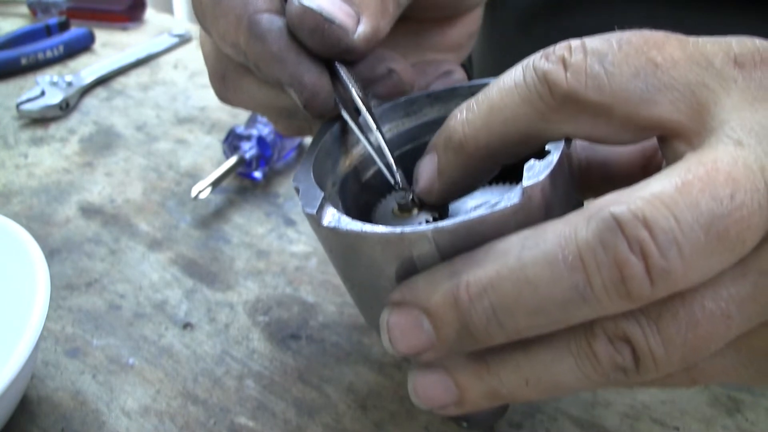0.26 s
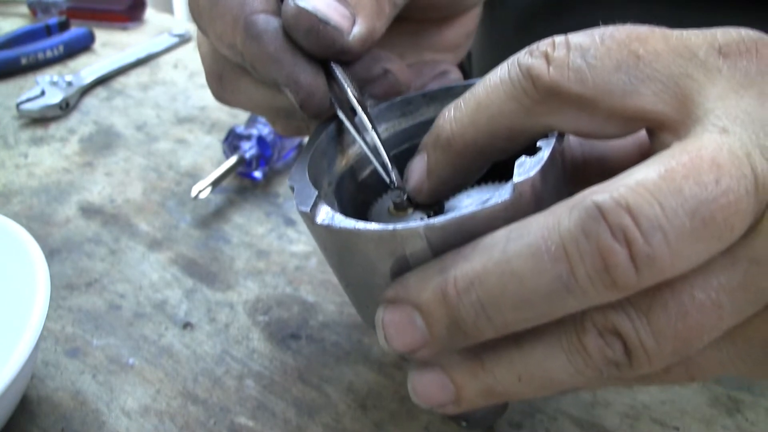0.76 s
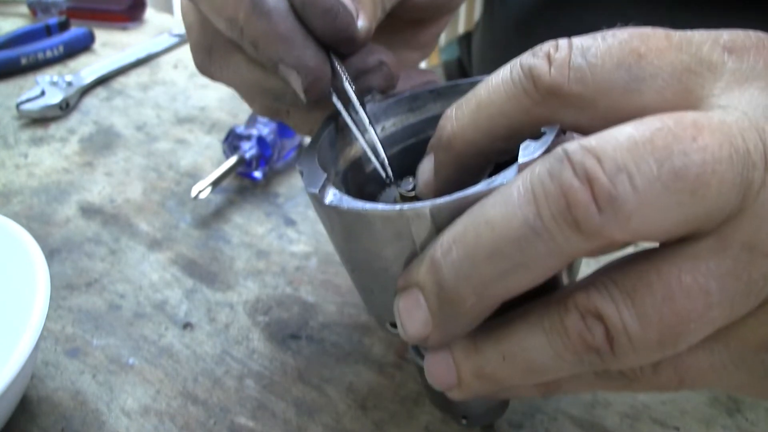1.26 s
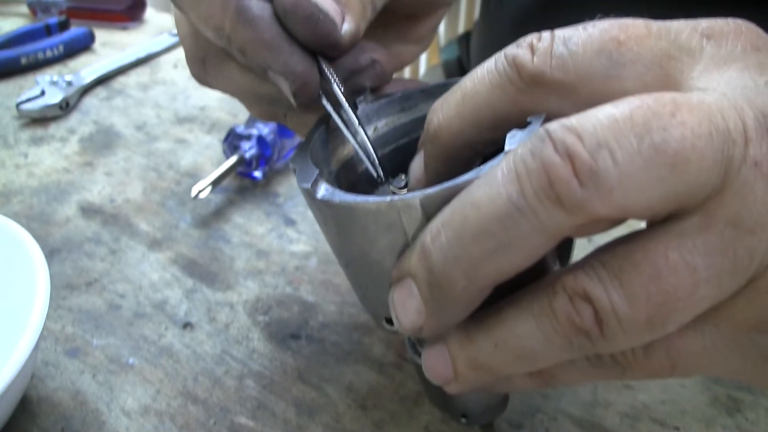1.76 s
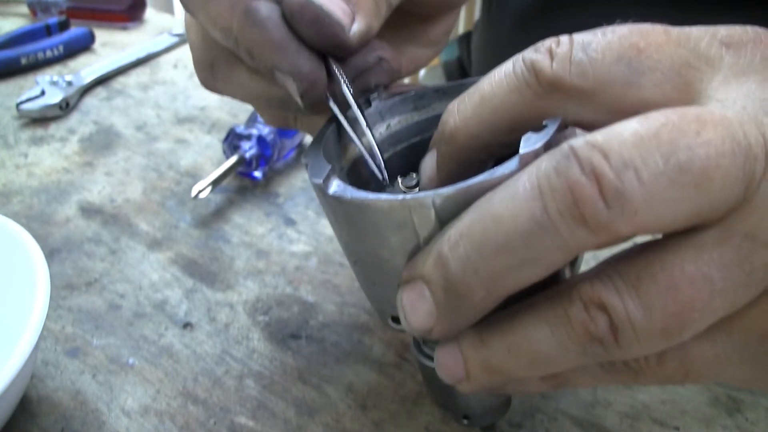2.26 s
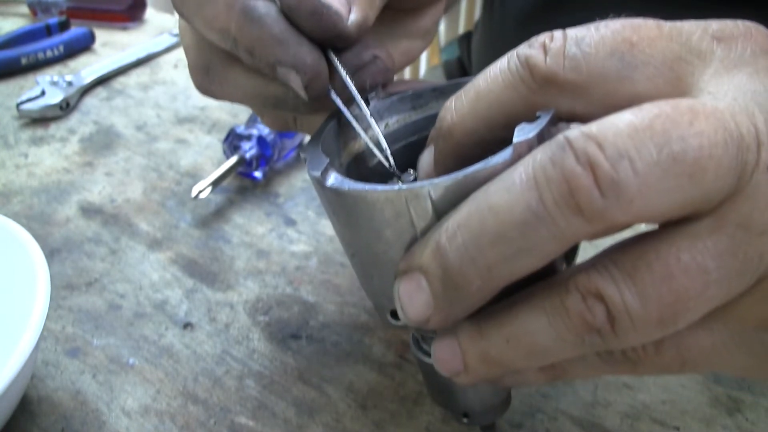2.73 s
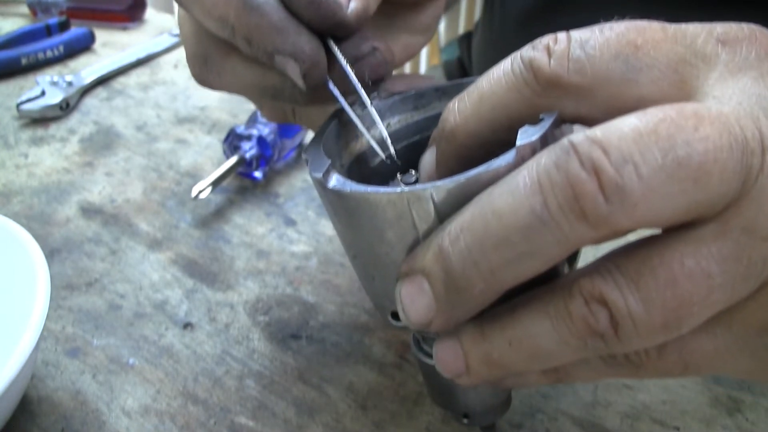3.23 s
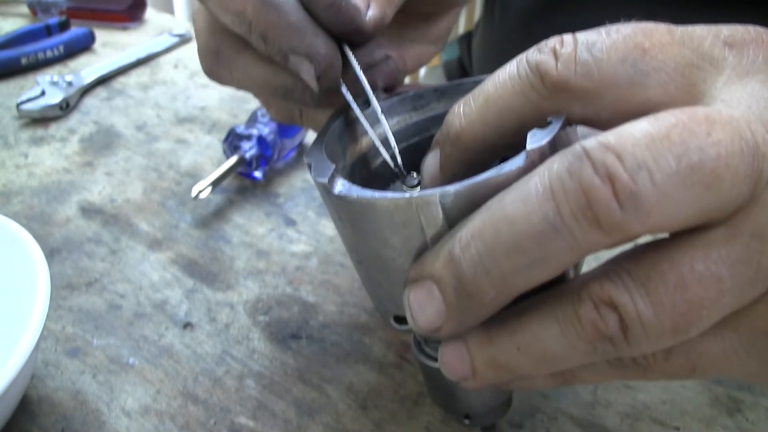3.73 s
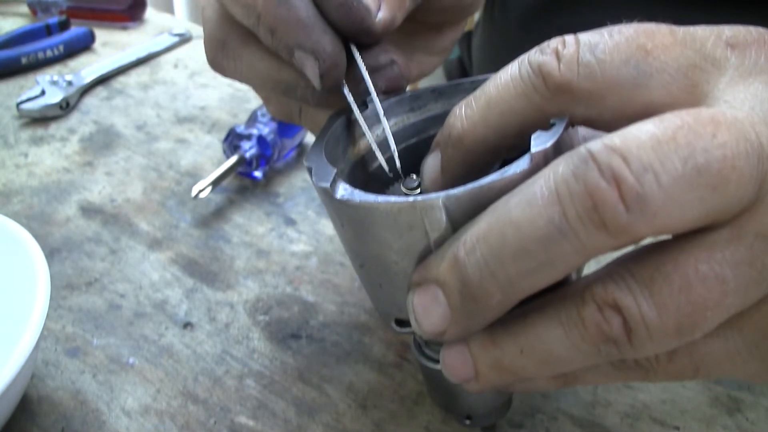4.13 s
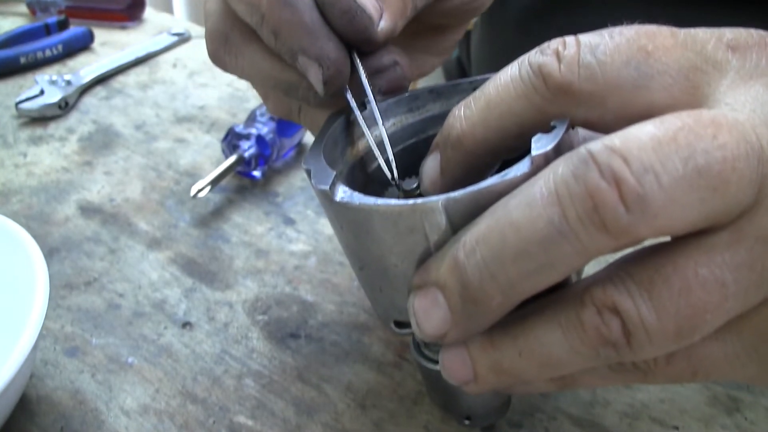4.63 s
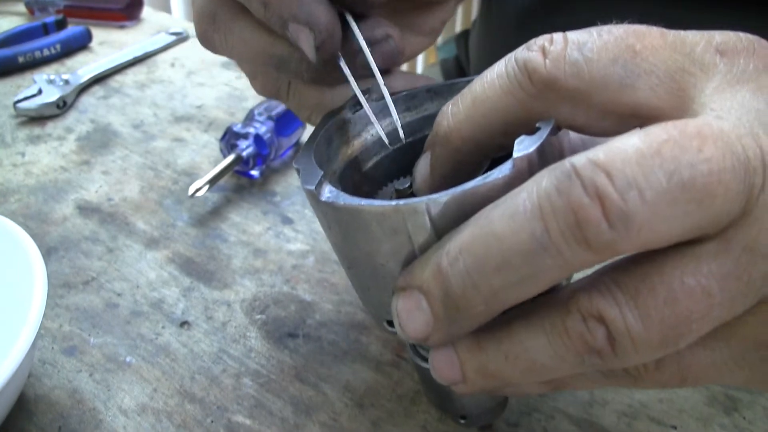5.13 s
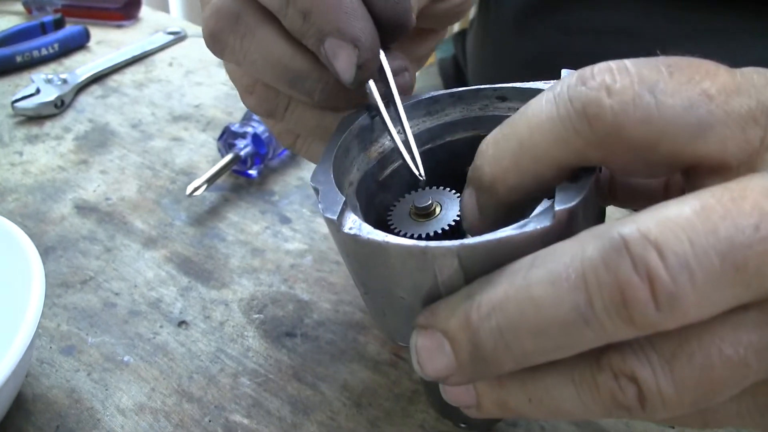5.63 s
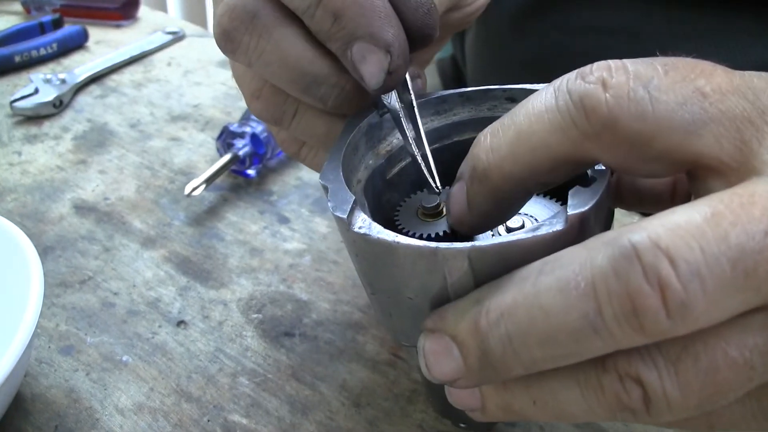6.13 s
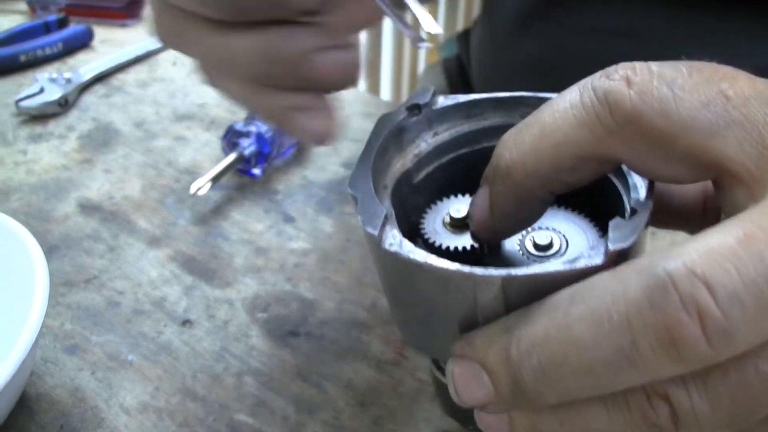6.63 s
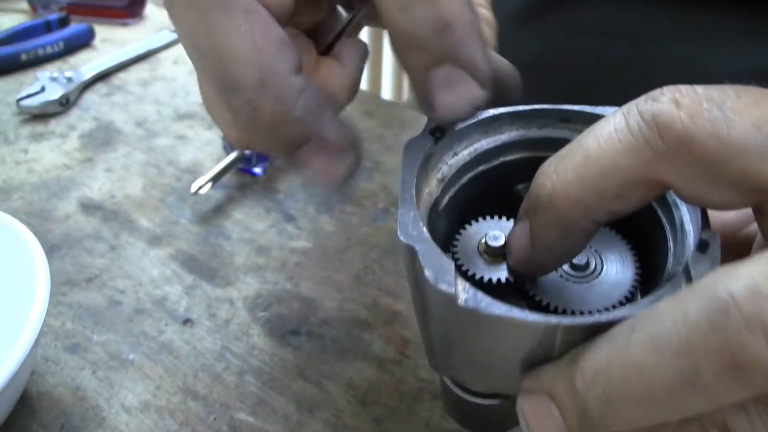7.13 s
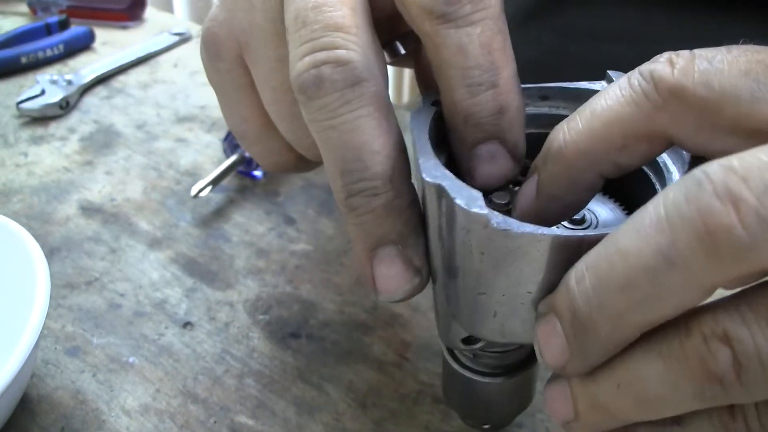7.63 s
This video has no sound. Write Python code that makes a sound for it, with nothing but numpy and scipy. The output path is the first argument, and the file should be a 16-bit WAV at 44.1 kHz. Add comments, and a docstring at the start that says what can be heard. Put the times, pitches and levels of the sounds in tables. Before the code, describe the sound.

Close stereo pickup of tweezer work inside a metal gear housing. A constant high, slightly buzzing whine and faint low drone fill the gaps. Nearly quiet handling comes first, then a loud crisp gear snap and quick rebounds, scattered pings, a second strong clack, a short faint scrape, tweezer ticks, and finally soft skin hiss on metal with a dull small tap. Small indoor space, light reverberation.

```python
"""In a small workshop, steel tweezers work on the gear shafts of a hand-held metal gearbox over a workbench.
Parts snap, tick and click: each touch sets off dying tones, a noise burst and echoes.
Fingers brush the metal as swelling hiss, and the tweezer tips scrape in many tiny slips.
A small motor whines close by with tones tied to its turning, over noise ringing in its casing.
Behind are faint wavering hums, a drone that sinks sharply near 5 s and creeps back, and air as shaped noise."""
import sys
import numpy as np
from scipy import signal
from scipy.fft import rfft, irfft
from scipy.io import wavfile

SR = 44100
rng = np.random.default_rng(int(sys.argv[2]) if len(sys.argv) > 2 else 0)


def wav_out(sig):
    """Save sig, one row per channel (or a flat mono array), as 16-bit PCM at SR to the path in sys.argv[1]."""
    wavfile.write(sys.argv[1], SR, np.round(np.clip(np.atleast_2d(sig).T, -1, 1) * 32767).astype(np.int16))


N = 347312
T = np.arange(N) / SR
RING_T = T[:SR // 2]   # time within one ring [s]
EARS = np.array([[.5], [-.5]])   # shares a left-right difference between left and right

# Ringing tones of the housing: (pitch [Hz], width before damping [Hz], relative level [dB])
HOUSING_MODES = [(589, 460, -13), (1698, 390, -4), (2263, 290, -5), (3330, 220, -7.5), (3770, 140, -2.5),
                 (5040, 140, 0), (5230, 170, 3.5), (7340, 170, -2.5), (7670, 120, -1), (8050, 190, -5.5),
                 (8700, 460, -9), (9610, 400, -12), (10700, 400, -5.5), (12220, 250, -10.5),
                 (12780, 250, -12.5), (14950, 300, -14.5)]
# gear: (pitch [Hz], width before damping [Hz], relative level [dB])
GEAR_MODES = [(5180, 310, -1.5), (5480, 410, -0.5), (6140, 220, 3.5), (6460, 290, 1.5), (6780, 240, -4),
              (7250, 290, -6), (8670, 230, 3), (9100, 260, 1), (9130, 190, 7), (9300, 280, 2),
              (10020, 190, -10), (10860, 180, -1), (11550, 180, -13), (11800, 295.5, -12.5),
              (13400, 180, -7), (13700, 250, 4.5), (15200, 250, -8)]
# gear shaft: (pitch [Hz], width before damping [Hz], relative level [dB])
SHAFT_MODES = [(3560, 32, 3.5), (3870, 110, 2), (4093, 150, -3), (7420, 231, -22.5), (10600, 250, -23.5),
               (14500, 170, -28)]
# thin washer: (pitch [Hz], width before damping [Hz], relative level [dB])
WASHER_MODES = [(5060, 140, 6), (5430, 200, -9), (5800, 252, -19)]
# small pin: (pitch [Hz], width before damping [Hz], relative level [dB])
PIN_MODES = [(3440, 48, 7), (7400, 250, -28), (15100, 200, -24)]
# rim of the housing, under the fingers: (pitch [Hz], width before damping [Hz], relative level [dB])
RIM_MODES = [(1604, 170, 0), (7360, 400, -25.5)]
# both tweezer tips, tuned a little apart: (pitch [Hz], width before damping [Hz], relative level [dB])
TIP_MODES = [(3920, 400, -21), (4620, 130, -7), (4810, 170, -7), (5120, 220, -10), (5730, 160, -16),
             (8090, 300, -11), (11330, 190, 1.5), (11670, 263, -6.5)]
# one tweezer prong: (pitch [Hz], width before damping [Hz], relative level [dB])
PRONG_MODES = [(2360, 370, -10), (4188, 120, -18), (5140, 160, -4.5), (8200, 260, -18), (10400, 230, -17),
               (11320, 110, -4), (11700, 230, -6)]
# small spacer ring: (pitch [Hz], width before damping [Hz], relative level [dB])
SPACER_MODES = [(4350, 80, 0), (5100, 70, -3), (8130, 150, -14), (11400, 90, -1)]
# whole gearbox held in the hand: (pitch [Hz], width before damping [Hz], relative level [dB])
KNOCK_MODES = [(89, 30, -11), (155, 32, 4.5), (255.8, 30, -2.5), (365, 55, -9), (505, 38, -1),
               (624, 80, -5.5), (708.3, 89, -4), (850, 76, -4), (1500, 205, -10), (2050, 120, -12),
               (2260, 120, -3)]
# tips dragged under pressure: (pitch [Hz], width before damping [Hz], relative level [dB])
DRAG_MODES = [(1650, 300, -5), (3600, 450, 4), (4280, 230, 3), (5060, 354, 1), (9000, 1500, -11),
              (11400, 300, -15)]
# motor casing, stirred by bearing noise: (pitch [Hz], width before damping [Hz], relative level [dB])
CASING_MODES = [(2366, 200, 4.5), (2835, 200, -29.5), (3790, 720, -13), (5150, 400, -18)]

# Touches of metal on metal: (time [s], what is hit, level before spreading [dB])
TOUCHES = [ (1.295, "tips", -63), (1.645, "tips", -63), (1.664, "rim", -44), (1.750, "tips", -60),
           (1.9971, "gear", -17), (2.0196, "washer", -30), (2.0195, "gear", -48), (2.0238, "washer", -39),
           (2.0323, "gear", -43), (2.081, "body", -49), (2.080, "rim", -47), (2.087, "body", -45),
           (2.368, "gear", -64), (2.9932, "housing", -49), (2.9934, "washer", -50), (2.9942, "shaft", -42),
           (3.0003, "shaft", -46), (3.043, "washer", -52), (3.887, "pin", -41.5), (4.61, "gear", -59),
           (4.7043, "housing", -24), (4.7072, "gear", -41), (4.72, "housing", -46), (5.049, "shaft", -52),
           (5.06, "pin", -54), (5.061, "housing", -58), (5.3715, "prong", -38), (5.374, "prong", -47),
           (5.615, "tips", -33.5), (5.6166, "washer", -52), (6.011, "body", -48), (6.013, "rim", -53),
           (6.129, "body", -54), (7.131, "spacer", -51.5)]
# How a touch spreads; "body" is the held gearbox as a whole: what is hit -> {ringing part: level [dB]}
TOUCH_SPREAD = { "housing": dict(housing=0, gear=-46, knock=-21),
                "gear": dict(gear=1, housing=-8, shaft=-24.5, knock=-5),
                "shaft": dict(shaft=-.5, housing=-26, tips=-24),
                "washer": dict(washer=0, gear=-28, knock=-19), "pin": dict(pin=0, gear=-30),
                "spacer": dict(spacer=0, knock=-8),
                "tips": dict(tips=-.5, housing=-25, shaft=-13.5, knock=-11),
                "prong": dict(prong=0, housing=-20, shaft=-10), "rim": dict(rim=0, housing=-15),
                "body": dict(knock=3.5, housing=-17.5)}
# Fingers sliding on tweezers and rim: (start [s], length [s], level [dB], attack [s], release [s])
FINGER_SLIDES = [(0.0, 0.087, -66, 0.011, .06), (6.612, 0.093, -57.5, 0.021, 0.068),
                 (6.765, 0.04, -61, .02, 0.049), (6.85, 0.049, -61.5, .025, 0.13),
                 (7.049, 0.064, -55.5, .04, .012), (7.375, 0.21, -67, 0.051, .07)]
# Tweezer tips scraping: (start [s], length [s], level [dB], attack [s], release [s])
TIP_SCRAPES = [(4.958, 0.091, -71, .013, .06), (5.3, 0.068, -61, .035, .05)]
# Hiss of skin on metal: (pitch [Hz], relative level [dB per Hz])
SKIN_HISS = [(2800, 10), (4500, 0.5), (7500, -3.5), (10000, 2.5), (13000, -7), (15500, -17)]

# Weaker motor tones, moved to the nearest multiple of the turning rate: (pitch [Hz], level [dB])
MOTOR_TONES = [(1942, -87.5), (2001, -86.5), (2060, -82), (2177, -77.5), (2472, -71.5), (2707, -85.5),
               (2884, -78), (3001, -91), (3060, -82.5), (3178, -87), (3354, -78), (3472, -96),
               (3531, -66.5), (3590, -67), (3825, -83.5), (4296, -81.5), (4943, -90.5), (5002, -85),
               (6474, -89.5)]
# Steady hums: (pitch [Hz], level [dB], left-right difference [dB], waver [share of the tone])
STEADY_HUMS = [(116.7, -72.5, -1.5, 0.16), (174.2, -68.5, -0.5, 0.34), (473, -64, 3, 0.29),
               (527, -72.5, -14.5, 0.39), (615, -76, 16, 0.407), (837.5, -72, -9, 0.21),
               (1233, -75.5, -3.5, 0.25)]
# Low drone and thin overtones: (pitch [Hz], level before its change over time [dB],
# left-right difference [dB], waver [share of the tone])
DRONE_TONES = [(155.7, -61.5, 4.5, 0.15), (1416, -73.5, 3.5, 0.87), (11930, -84, -22.5, .2),
               (12160, -88, -25.5, .2)]
# Level of the drone over time: (time [s], level change [dB])
DRONE_COURSE = [(0, 1.5), (4.5, 2.5), (5.0, -5.5), (5.4, -23), (7.88, -7.5)]
# Workshop air: (pitch [Hz], relative level [dB per Hz])
AIR_NOISE = [(25, -105), (55, -100), (105, -94.5), (210, -84.5), (350, -85), (550, -85), (1000, -90.5),
             (1500, -92), (2100, -99), (3300, -101), (6000, -111), (8500, -115), (11200, -116),
             (15000, -123)]
# How alike noise is in left and right: (pitch [Hz], likeness [-1 opposite to 1 same])
EAR_LIKENESS = [(60, 0.61), (140, 0.87), (290, -0.23), (1400, -0.21), (3100, 0.23), (7000, 0.29),
                (15000, -0.25)]
# Clicks reaching the two microphone ports: (pitch [Hz], left lead [radians])
PORT_LEAD = [(4000, 0.02), (9000, 0), (11000, 1.3), (13000, -1.3), (14000, 3.5), (15500, 1)]
# Clicks reaching the two microphone ports: (pitch [Hz], left-right difference [dB])
PORT_LEVELS = [(200, 0.5), (700, 3), (2400, 1.5), (4400, 0.5), (8500, 1), (12000, -1), (14000, 3.5)]

MOTOR_HZ = 58.85   # average turns per second
MESH_ORDER = 40   # waves of the main tone per turn
SWING_LAG = 2.45   # radians between the swing in phase and the swing in level
WAVER_HZ = 5   # speed setting of the hums' waver
SKIN_LOW_HZ = 2500   # skin hiss is thinned below this
GEAR_DAMPING = 1.15   # the finger on the gear widens its tones by this factor
# The loose gear rattles on its shaft: first gap, growth of each next gap, loss per rebound
RATTLE_GAP_S, RATTLE_GROWTH, RATTLE_LOSS_DB = 0.0039, 2.3, 13
BODY_LOW_HZ = 95   # so small a body radiates little below this
ROOM_T60_S, NEAR_T60_S = 0.5, 0.1   # time for room tail and near scatter to lose 60 dB
BASS_CUT_HZ, CUTOFF_HZ = 50, 15650   # microphone's bass and top limits


def from_db(db):
    """Turn decibels into a multiplying factor."""
    return 10 ** (np.asarray(db) / 20)


def rms_one(x):
    """Scale a sound to an rms (average strength) of 1."""
    return x / np.sqrt(np.mean(x ** 2) + 1e-20)


def unit_energy(x):
    """Scale a short sound so its squared samples add up to 1."""
    return x / np.sqrt(np.sum(x ** 2))


def at_hz(points, hz):
    """Read a table between its pitches, spaced by ratio as in music."""
    table_hz, value = np.transpose(points)
    return np.interp(np.log(np.maximum(hz, 1)), np.log(table_hz), value)


def highpass(x, hz, order):
    """Thin out the sound below a pitch."""
    return signal.sosfilt(signal.butter(order, hz, "high", fs=SR, output="sos"), x)


def dying(t60):
    """Fade that loses 60 dB in t60 seconds."""
    return np.exp(-np.log(1000) * RING_T / t60)


def drift(rate):
    """Slow random wander of spread 1, worked out at every 32nd sample; a higher rate in Hz is quicker."""
    coarse = T[::32]
    hz = np.fft.rfftfreq(len(coarse), coarse[1])
    spectrum = rfft(rng.standard_normal(len(coarse))) / (1 + (hz / rate) ** 2)
    return np.interp(T, coarse, rms_one(irfft(spectrum, len(coarse))))


def ring(modes, damping, signs):
    """A part's answer to one tap: dying sines of unit energy in all; more damping widens and shortens them."""
    out = np.zeros(len(RING_T))
    for sign, (hz, width, db) in zip(signs, modes):
        fade = np.exp(-np.pi * width * damping * RING_T)
        out += sign * from_db(db) * width * np.sin(2 * np.pi * hz * RING_T) * fade
    return unit_energy(out)


def motor(speed_jitter, waver_db, mesh_db, level_swing, phase_swing, swing_lag, fade_db, bearing_db):
    """Tones tied to the turning; the rotor runs off centre, so the main tone swings in level and pitch each turn.
    The weaker tones each fade and return on their own, and bearing noise rings in the casing."""
    angle = 2 * np.pi * np.cumsum(MOTOR_HZ * (1 + speed_jitter * drift(10.9))) / SR
    swinging_level = 3 + level_swing * np.cos(angle)
    swinging_phase = MESH_ORDER * angle + phase_swing * np.cos(angle + swing_lag)
    main_tone = rms_one(swinging_level * np.cos(swinging_phase))
    out = from_db(mesh_db + waver_db * drift(11.0)) * main_tone
    for hz, db in MOTOR_TONES:
        level = from_db(db + waver_db * drift(17.0) + fade_db * drift(2.5))
        multiple = round(hz / MOTOR_HZ)
        out += np.sqrt(2) * level * np.cos(multiple * angle + rng.uniform(0, 2 * np.pi))
    # three signs, so only the first three casing tones ring
    casing = ring(CASING_MODES, damping=0.32, signs=[1, -1, 1])
    bearing = signal.fftconvolve(rng.standard_normal(N), casing)[:N]
    return out + from_db(bearing_db) * rms_one(bearing)


def hums(table, spread):
    """Tones that waver in level and phase; spread is how far the ears are out of step, in radians."""
    out = np.zeros((2, N))
    for hz, db, pan_db, waver in table:
        wander = 1 + waver * (drift(WAVER_HZ) + 1j * drift(WAVER_HZ))
        tone = wander * np.exp(2j * np.pi * hz * T)
        ears = from_db(EARS * pan_db) * np.exp(1j * EARS * spread)
        out += from_db(db) * rms_one((tone * ears).real)
    return out


def drone():
    """Low hum with thin overtones; its level sinks sharply near 5 s and then creeps back."""
    level = from_db(np.interp(T, *np.transpose(DRONE_COURSE)))
    return hums(DRONE_TONES, spread=1.34) * level


def stereo_noise(spectrum):
    """Shaped noise: a shared part and an opposite part set how alike the two channels are at each pitch."""
    hz = np.arange(N // 2 + 1) * SR / N
    alike = np.clip(at_hz(EAR_LIKENESS, hz), -1, 1)
    mid, side = rfft(rng.standard_normal((2, N)))
    pair = np.sqrt(1 + alike) * mid + np.sqrt(1 - alike) * side * [[1], [-1]]
    return irfft(pair * from_db(at_hz(spectrum, hz)) * np.sqrt(SR / 2), N)


def workshop_air():
    """Faint broad noise of the room, a little weaker on the right."""
    return stereo_noise(AIR_NOISE) * from_db([[-.3], [-1.7]])


def slide(start, length, db, attack_s, release_s):
    """Pressure of one slide: it takes hold, moves evenly and eases off."""
    attack = 1 - np.exp(-np.maximum(T - start, 0) / attack_s)
    release = np.exp(-np.maximum(T - start - length, 0) / release_s)
    return from_db(db) * attack * release


def fingers(grain_db):
    """Skin hisses along the metal; each slide swells and fades, and the skin catches unevenly."""
    hiss = rms_one(highpass(stereo_noise(SKIN_HISS), SKIN_LOW_HZ, order=2))
    pressure = sum(slide(*row) for row in FINGER_SLIDES)
    return pressure * from_db(grain_db * drift(120)) * hiss


def crack(low_hz, high_hz, t60):
    """A part's many quickly dying tones, heard as a short noise burst of unit energy."""
    band = signal.butter(2, [low_hz, high_hz], "band", fs=SR, output="sos")
    return unit_energy(signal.sosfilt(band, rng.standard_normal(len(RING_T)) * dying(t60)))


def workshop(x, near_db, room_db, wall_hz):
    """Quick scatter from hands and bench, then the dull tail of the room, different at each ear."""
    near, far = rng.standard_normal((2, 2, len(RING_T)))
    # both build up before they die away
    near = near * dying(NEAR_T60_S) * (1 - dying(0.028))
    far = signal.sosfilt(signal.butter(1, wall_hz, fs=SR, output="sos"), far)
    far = far * dying(ROOM_T60_S) * (1 - dying(0.093))
    echo = from_db(near_db) * rms_one(near) + from_db(room_db) * rms_one(far)
    return signal.fftconvolve(x[None], echo / np.sqrt(len(RING_T)), axes=1)


def struck(modes, damping, crack_db, low_hz, high_hz, t60, wet_db, in_step=False, count=5):
    """One tap on a part as both ears get it; tones that start in step give a sudden thud.
    The part radiates differently in every direction, so the echoes blend into a smooth tail."""
    def radiated(signs):
        """Tones and crack sent out in one direction."""
        motion = ring(modes, damping, signs) + from_db(crack_db) * crack(low_hz, high_hz, t60)
        return highpass(motion, BODY_LOW_HZ, order=2)

    direct = radiated(np.ones(len(modes)) if in_step else (-1) ** np.arange(len(modes)))
    echoes = 0
    for _ in range(count):
        direction = radiated(rng.choice([-1, 1], len(modes)))
        echoes = echoes + workshop(direction, near_db=-4.5, room_db=-15.5, wall_hz=7500)
    heard = direct + from_db(wet_db) * echoes[:, :len(direct)] / np.sqrt(count)
    return heard * np.sqrt(SR / 1000)   # count energy per millisecond


def rattle(second, db, count=3):
    """A hit and its rebounds, each later and weaker than the last: (time [s], level [dB])."""
    gaps = RATTLE_GAP_S * RATTLE_GROWTH ** np.arange(count)
    return zip(second + np.cumsum(gaps) - gaps, db - RATTLE_LOSS_DB * np.arange(count))


def two_ports(x):
    """The waves bend round the microphone body and reach its two ports unequal and out of step."""
    hz = np.fft.rfftfreq(N, 1 / SR)
    level = from_db(EARS * at_hz(PORT_LEVELS, hz))
    lead = np.exp(1j * EARS * at_hz(PORT_LEAD, hz))
    return irfft(rfft(x) * level * lead, N)


def contacts():
    """Each touch rings the part that is hit and, more weakly, parts joined to it; the gear rebounds."""
    parts = dict(
        housing=struck(HOUSING_MODES, damping=0.86, crack_db=-7.5, low_hz=917, high_hz=12500,
                       t60=0.023, wet_db=1.5),
        gear=struck(GEAR_MODES, damping=GEAR_DAMPING, crack_db=-2, low_hz=4540, high_hz=15200,
                    t60=0.0097, wet_db=-1.5),
        shaft=struck(SHAFT_MODES, damping=1.3, crack_db=-7.5, low_hz=3315, high_hz=4320, t60=.02, wet_db=0),
        washer=struck(WASHER_MODES, damping=1.1, crack_db=-8, low_hz=1214, high_hz=7000, t60=.01, wet_db=1.0),
        pin=struck(PIN_MODES, damping=0.79, crack_db=-16, low_hz=3000, high_hz=12000, t60=.03, wet_db=-1.0),
        rim=struck(RIM_MODES, damping=1.25, crack_db=-5.5, low_hz=900, high_hz=3014, t60=.02, wet_db=3.0),
        tips=struck(TIP_MODES, damping=0.39, crack_db=-13, low_hz=1800, high_hz=8000, t60=0.0089, wet_db=-9),
        prong=struck(PRONG_MODES, damping=0.6, crack_db=-12, low_hz=1600, high_hz=8500, t60=0.014, wet_db=-3),
        spacer=struck(SPACER_MODES, damping=0.8, crack_db=-14, low_hz=3500, high_hz=6000,
                      t60=0.015, wet_db=-5),
        knock=struck(KNOCK_MODES, damping=0.61, crack_db=-12, low_hz=428.7, high_hz=838,
                     t60=0.045, wet_db=-2.5, in_step=True))
    out = np.zeros((2, N + len(RING_T)))
    for second, hit, level_db in TOUCHES:
        sound = sum(from_db(db) * parts[name] for name, db in TOUCH_SPREAD[hit].items())
        hits = rattle(second, level_db) if hit == "gear" else [(second, level_db)]
        for hit_second, hit_db in hits:
            start = int(hit_second * SR)
            out[:, start:start + len(RING_T)] += from_db(hit_db) * sound
    return two_ports(out[:, :N])


def scrapes(slips_per_s, size_db):
    """The tips drag over the gear in many tiny slips; size_db is how much the slips vary in strength."""
    happens = rng.random(N) < slips_per_s / SR
    slips = happens * rng.choice([-1, 1], N) * from_db(size_db * rng.standard_normal(N))
    drag = ring(DRAG_MODES, damping=0.59, signs=(-1) ** np.arange(len(DRAG_MODES)))
    rasp = signal.fftconvolve(slips, drag)[:N]
    return rms_one(rasp) * sum(slide(*row) for row in TIP_SCRAPES)


def scene():
    """Handwork in front, the motor close and central, hums and air all round."""
    whine = motor(speed_jitter=0.00041, waver_db=0.5, mesh_db=-54.0, level_swing=1.54, phase_swing=0.5,
                  swing_lag=SWING_LAG, fade_db=2.0, bearing_db=-64)
    whine = whine * from_db([[.3], [-.3]])   # left a touch louder
    background = hums(STEADY_HUMS, spread=0.29) + drone() + workshop_air()
    handwork = fingers(grain_db=1.5) + contacts() + scrapes(slips_per_s=1000, size_db=0)
    return whine + background + handwork


def record(dry):
    """The microphone thins the deep bass; the top is cut steeply."""
    thinned = highpass(dry, BASS_CUT_HZ, order=1)
    return signal.sosfilt(signal.ellip(12, .1, 80, CUTOFF_HZ, fs=SR, output="sos"), thinned)


dry = scene()
out = record(dry)
wav_out(out)
```